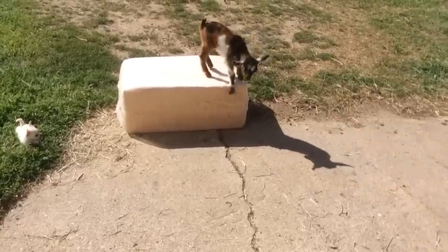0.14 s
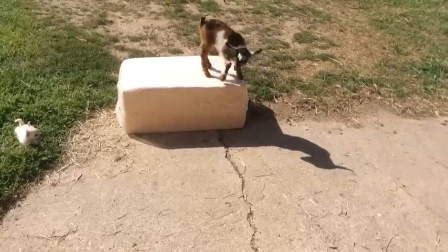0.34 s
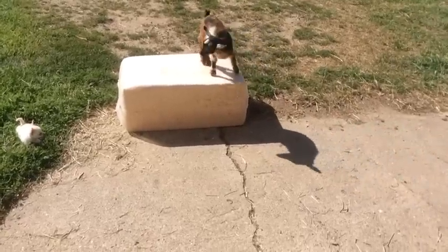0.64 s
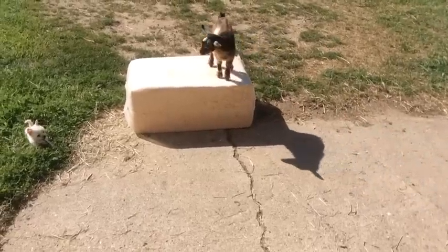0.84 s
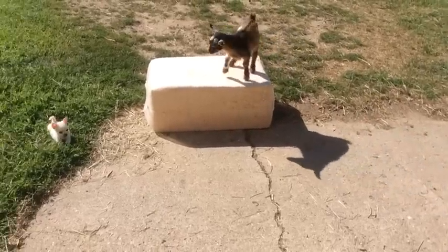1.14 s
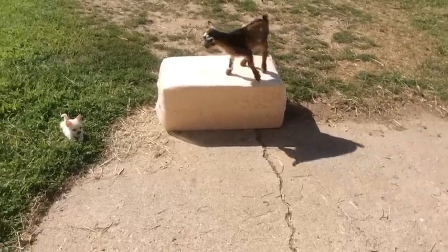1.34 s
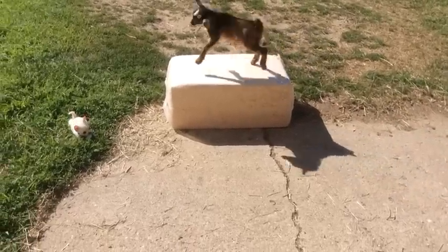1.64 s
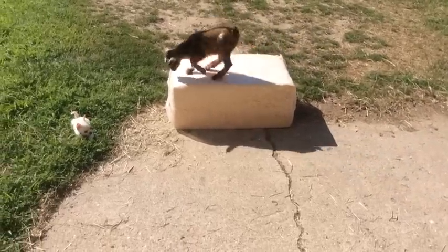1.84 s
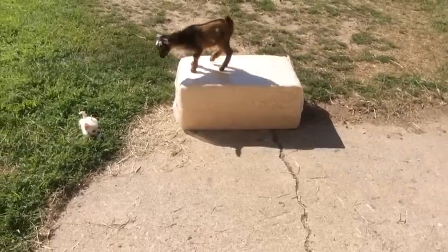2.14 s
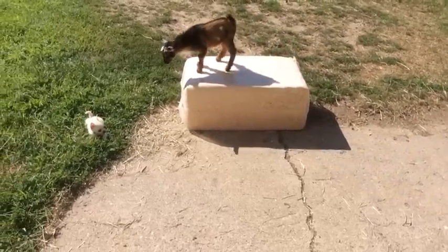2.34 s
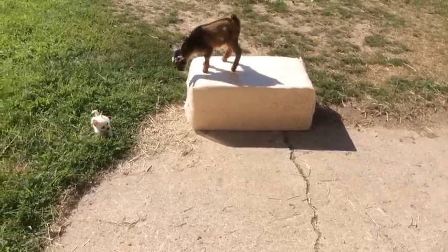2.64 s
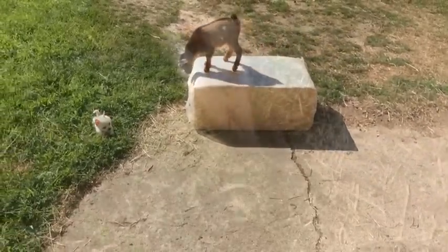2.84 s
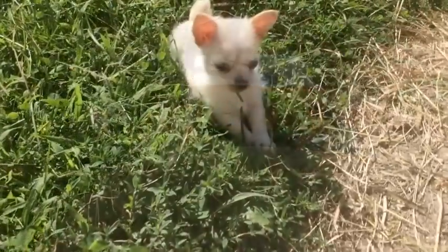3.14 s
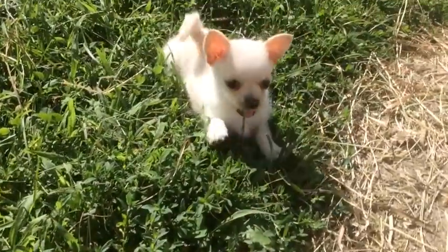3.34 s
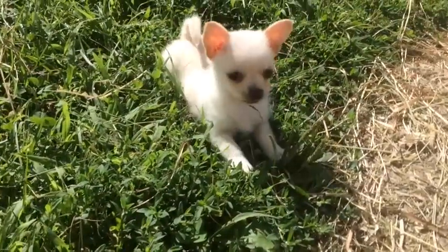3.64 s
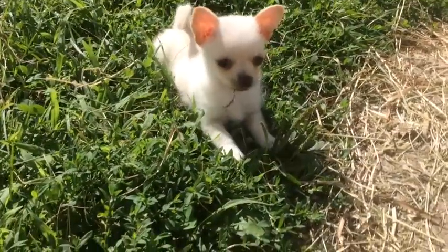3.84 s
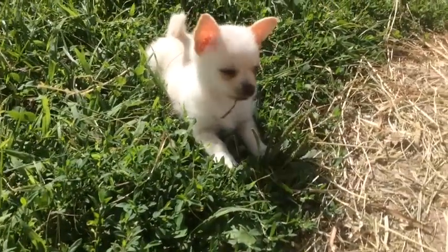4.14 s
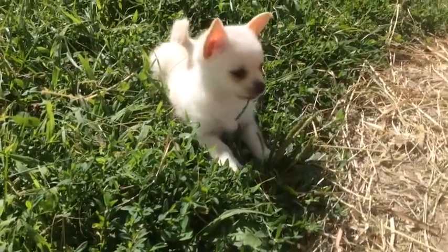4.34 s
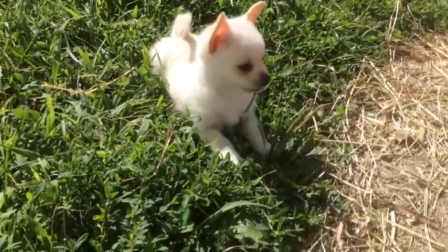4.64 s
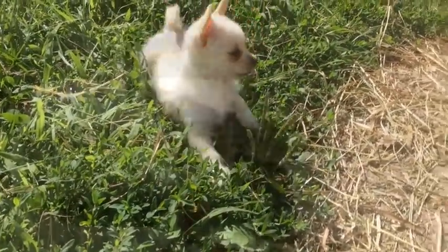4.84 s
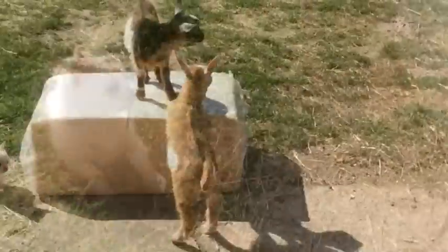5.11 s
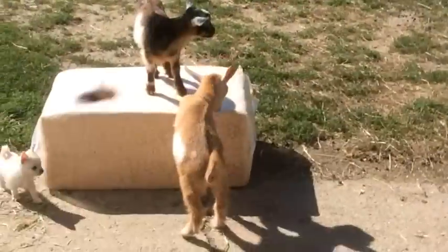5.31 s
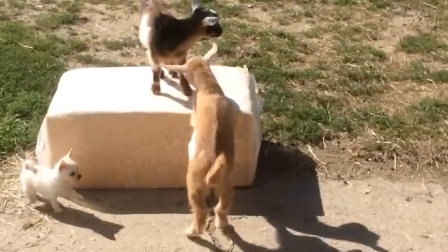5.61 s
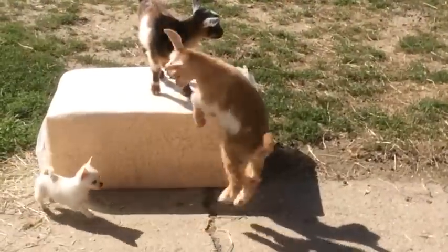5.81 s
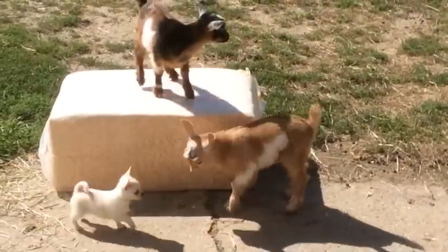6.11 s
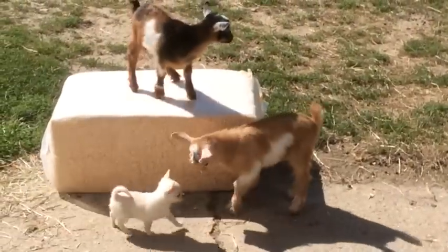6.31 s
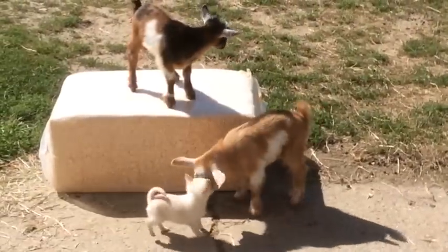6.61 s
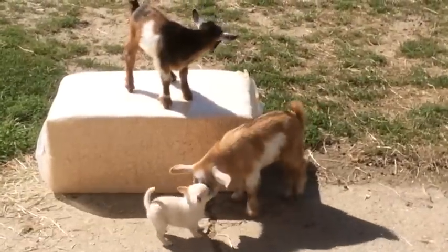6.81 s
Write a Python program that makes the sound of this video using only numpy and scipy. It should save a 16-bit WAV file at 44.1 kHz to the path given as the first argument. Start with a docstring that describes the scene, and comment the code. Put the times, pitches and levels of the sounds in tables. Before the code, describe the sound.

A goat kid gives a high, quavering bleat right at the start, a few metres away, lasting about half a second. Light hoof steps on a plastic-wrapped bale follow from 0.6 to 1.4 seconds. Firmer thuds land at around 1.9 seconds, together with a second, softer bleat. A third, quieter bleat comes at about 3.5 seconds. Light steps and small scrapes resume after 4.1 seconds, building to a quick, louder clatter of thuds and plastic crackle from 4.7 to 5.1 seconds. The last and loudest bleat trembles from 5.4 to 6 seconds, dropping slightly in pitch, followed by one soft hoof scuff. The yard has a faint, short echo. A light breeze, rustling grass and insect hiss continue quietly throughout. A distant bird peeps faintly during the first three seconds, and an insect chirps thinly and steadily from about 5.3 seconds until the end, near 7 seconds.

```python
"""Goat kids in a farmyard

Goat kids give four high, quavering bleats a few metres away. Each bleat is a chain of short throbs,
made by vocal folds that snap shut and set the throat and mouth ringing. Small hooves thud and scrape
on a plastic-wrapped bale, and the yard echoes faintly. Behind them a distant bird peeps, insects
chirp and hiss, and a light breeze blows over rustling grass."""
import sys
import numpy as np
from scipy import signal
from scipy.fft import rfft, irfft, next_fast_len
from scipy.io import wavfile
from scipy.ndimage import map_coordinates

SR = 44100
rng = np.random.default_rng(int(sys.argv[2]) if len(sys.argv) > 2 else 0)


def digitize_waveform(pressure):
    """Quantize a signal to 16-bit integers and store it at the path in sys.argv[1].

    Rows of a 2-D input are taken as channels; values are limited to [-1, 1].
    """
    field = np.atleast_2d(pressure).T
    bounded = np.clip(field, -1, 1)
    quanta = np.round(bounded * 32767).astype(np.int16)
    wavfile.write(sys.argv[1], SR, quanta)


N = 307359

# the throbs of each bleat: (peak time [s], level [dB], pitch [Hz], rise time [s])
BLEAT_1 = [(.012, -35, 213.6, .028), (.123, -32.5, 208.5, 0.03), (.224, -33, 202.7, 0.029),
           (.336, -35, 191.4, 0.028), (.438, -54.5, 203, 0.027)]
BLEAT_2 = [(1.914, -42, 221.6, .018), (2.015, -37.5, 231.5, .028), (2.115, -39.5, 217.3, .033),
           (2.224, -40.5, 206.3, .032), (2.35, -44.5, 173, 0.03)]
BLEAT_3 = [(3.448, -59, 202, 0.027), (3.547, -45, 221.2, 0.027), (3.648, -42.5, 214, 0.037),
           (3.756, -43.5, 203.6, 0.033), (3.865, -43, 193, 0.033), (3.957, -55, 202, 0.03),
           (3.997, -54.5, 187, .022)]
BLEAT_4 = [(5.383, -44, 231, 0.011), (5.407, -49, 234, 0.003), (5.487, -32, 226.7, 0.021),
           (5.589, -32, 221.7, 0.028), (5.694, -34, 222.3, 0.023), (5.807, -35.5, 201.1, .024),
           (5.935, -37.5, 186.6, 0.027), (6.07, -61.5, 171, .035)]
# resonances, where throat and mouth ring in each bleat: (base frequency [Hz], width [Hz], level [dB])
RESONANCES_1 = [(207, 74, -26.5), (393, 43, -29), (844, 107, -1), (1040, 66, -22.5), (1780, 177, -5.5),
                (2120, 100, -17.5), (2760, 340, -10), (3280, 430, -11.5), (4003, 400, 4.5),
                (4920, 850, -13), (9600, 2200, -26), (13200, 2500, -44)]
RESONANCES_2 = [(210, 110, -32), (410, 61, -18), (856, 83, -0.5), (1230, 400, -23), (1788, 110, -6),
                (2115, 85, -8), (2850, 340, -6), (3480, 150, -2), (3964, 310, 5), (5070, 610, -11),
                (9350, 2500, -29), (13200, 2300, -34)]
RESONANCES_3 = [(191, 120, -8), (465, 130, -1), (847, 106, 7.5), (1660, 200, -8), (2100, 66, -5.5),
                (2750, 1070, -1.5), (3930, 310, 7.5), (5080, 990, -2.5), (6700, 440, -17), (9600, 2500, -7),
                (14100, 870, -13)]
RESONANCES_4 = [(212, 85, -14), (460, 48, -24), (688, 16, -16.5), (864, 69, 2.5), (996, 19, 1.5),
                (1767, 200, 1), (2300, 220, -9.5), (2910, 1220, -8), (3247, 355, 5), (3687, 160, 4),
                (8800, 3000, -27), (13100, 3000, -32)]
# hoof blows, levels relative: (time [s], thud [dB], thud pitch [Hz], knock [dB], crackle [dB])
HOOF_BLOWS = [(.653, -61, 199, -49.5, -50), (.967, -47.5, 130, -56, -55.5), (1.819, -34.5, 220, -43.5, -52),
              (1.9008, -31.5, 141, -31.5, -37), (1.953, -38, 165, -49, -50), (2.16, -42.5, 168, -54, -49.5),
              (4.136, -48, 174, -48.5, -67), (4.279, -47.5, 242, -56, -57), (4.745, -35, 393, -43, -36),
              (4.7503, -24, 475, -40, -28.5), (4.759, -32, 383, -35, -27), (4.812, -33, 250, -41, -41),
              (4.818, -23.5, 534, -38, -41), (4.822, -31.5, 197, -36, -34), (4.831, -32.5, 172, -35.5, -44),
              (4.938, -57, 245, -46.5, -52), (4.969, -60, 248, -51, -58), (5, -39, 159, -37, -44.5),
              (5.017, -47, 196, -40, -51), (5.026, -41, 183, -33, -33), (5.068, -42, 152, -50, -60),
              (5.09, -39, 140, -35.5, -44), (5.117, -48, 145, -57, -68), (5.348, -57, 132, -44.5, -53),
              (6.079, -53, 163, -50, -71)]
# one light step, levels relative: (thud [dB], thud pitch [Hz], knock [dB], crackle [dB])
LIGHT_STEP = (-54, 170, -56, -57)
# spells of restless stepping: (start [s], end [s])
RESTLESS_SPELLS = [(0.599, 1.4), (4.15, 4.72), (4.951, 5.2)]
# the bale's tones: (frequency [times the thud pitch], level [dB], ring time [cycles of the thud pitch])
BALE_TONES = [(1, 3.5, 9), (.62, -8, 5.3), (1.45, -8, 9.4), (2.2, -17, 7)]
# hooves sliding on the wrap: (time [s], level [dB], half length [s])
HOOF_SLIDES = [(0.689, -67, 0.06), (1.837, -54, 0.017), (1.9017, -39.5, 0.0026), (4.249, -52, 0.0027),
               (4.333, -63.5, 0.014), (6.079, -57.5, 0.012)]
# tone colour of knocked straw, crackling wrap and a swish on plastic: (frequency [Hz], level [dB])
KNOCK_COLOUR = [(100, -4.5), (300, 5), (510, -2.5), (700, -3), (1000, -2.5), (1300, -13), (1900, -7),
                (3000, -7.5), (6000, -80), (16000, -59)]
CRACKLE_COLOUR = [(300, -26), (1400, -63), (2600, -6.5), (3900, 6), (5000, -1), (6400, 0), (7800, -4.5),
                  (11000, -6.5), (15500, -12)]
SWISH_COLOUR = [(2000, -12.5), (5000, -3), (9000, 2), (12500, -2), (15500, -6.5)]
# how long the yard echoes: (frequency [Hz], time to fade by 60 dB [s])
ECHO_TIMES = [(200, 0.18), (900, 0.18), (4000, 0.17), (10000, 0.13)]
# the bird's double peeps: (time [s], level [dB])
BIRD_PEEPS = [(.58, -71), (1.33, -62.5), (1.6, -63), (2.8, -65)]
# loudness of the background: (time [s], breeze [dB], grass rustle [dB], insect hiss [dB])
BACKGROUND_LEVELS = [(0, -70, -61, -64.5), (1.4, -71, -62.5, -69), (2.1, -66, -61, -65.5),
                     (2.7, -73, -62, -69), (3.2, -66, -68, -68.5), (3.7, -67, -62, -66),
                     (4.2, -63.5, -65, -69.5), (4.9, -66.5, -66, -67.5), (5.4, -73.5, -62.5, -65.5),
                     (6.97, -70, -65.5, -68.5)]
# tone colour of the breeze, the grass and the insect hiss: (frequency [Hz], level [dB])
BREEZE_COLOUR = [(15, -26), (25, -12), (50, -0.5), (82, 3.5), (118, -1.5), (146, -3.5), (204, -1.5),
                 (243, -7.5), (400, -15.5), (520, -32), (880, -120)]
RUSTLE_COLOUR = [(180, 2.5), (300, -0.5), (428, -1.5), (603, 1), (725, -3.5), (1180, -4), (1380, -6),
                 (4840, -6), (6140, -12.5), (7000, -15), (9100, -42), (15400, -120)]
HISS_COLOUR = [(3530, -51), (6000, -14), (7030, -2.5), (8000, 9), (9070, 3), (9640, -0.5), (11600, -2.5),
               (14500, -1.5), (15300, -6), (15800, -0.5)]


def bleat(throbs, throat, rough, scale, climb, settle_s, glide, darken_db, jitter, echo_db):
    """A goat's call: a chain of throbs through one throat, darker towards the end, with its echo."""
    voice = np.zeros(N)
    times, levels = np.transpose(throbs)[:2]
    for row, age, weakness_db in zip(throbs, times - times[0], levels.max() - levels):
        progress = age / np.ptp(times)
        hoarse = rough - 0.02 * weakness_db + 0.063 * progress ** 2  # rougher when loud, and late on
        low_boost_db = darken_db * progress ** 3.1
        upper_scale = scale - climb * np.exp(-age / settle_s)  # the upper resonances climb, then settle
        for start, pulse in throb(row, throat, hoarse, low_boost_db, upper_scale, glide, jitter):
            add(voice, start, pulse)
    return voice + amp(echo_db) * yard_echo(voice, delay_s=0.018)


def throb(row, throat, rough, low_boost_db, scale, glide, jitter, snaps=37, size=1024):
    """The vocal folds snap shut over and over as the mouth opens and closes: (start sample, pulse) pairs."""
    peak_s, db, pitch_hz, rise_s = row
    hz, t = np.fft.rfftfreq(size, 1 / SR), np.arange(size) / SR
    unevenness = jitter * rough * rng.standard_normal(snaps)
    when = (np.arange(snaps) - snaps // 2 + unevenness) / pitch_hz  # seconds from the peak
    when = when + 0.25 * when ** 2  # the snaps spread out, so the pitch sags
    opening = np.maximum(-when, 0) / rise_s
    closing = np.maximum(when, 0) / (0.53 * rise_s)  # a throb dies faster than it swells
    effort_db = -10 * opening ** 1.48 - 11 * closing ** 2.1
    voiced = np.clip(1 + (when + 1.42 * rise_s) * pitch_hz, 0, 1)  # the folds start within one cycle
    gain = mouth(throat, hz, opening, closing, low_boost_db, scale, glide)
    # each snap lets a puff of rushing air through, strongest in the treble
    puff = rng.standard_normal((snaps, size)) * fade(t, t60=0.013)
    puff = rfft(puff / np.linalg.norm(puff, axis=1, keepdims=True))
    air_share = np.clip(rough * along([(700, 0.72), (4000, 1.29), (9000, 8.5)], hz), 0, 0.95)
    start, fraction = np.divmod((peak_s + when) * SR, 1)
    snap = np.exp(-2j * np.pi * hz * fraction[:, None] / SR)  # a click placed between two samples
    source = np.sqrt(1 - air_share) * snap + np.sqrt(air_share) * puff
    pulses = irfft(ringing(gain) * source)
    flicker_db = 0.23 * rng.standard_normal(snaps)
    strength = voiced * amp(db + effort_db + flicker_db) * np.sqrt(SR / pitch_hz)
    return zip(start.astype(int), pulses * strength[:, None])


def mouth(throat, hz, opening, closing, low_boost_db, scale, glide, split_hz=2500):
    """Tone colour of each snap: as the mouth opens, low resonances swell and upper ones slide down."""
    closed = np.minimum(opening, 1.5)[:, None] ** 2
    slide = scale * (1 + glide * closed ** 1.4)
    muted_db = 4.5 * closed + 4 * np.minimum(closing, 2)[:, None]
    gain = 0
    for centre, width, db in throat:
        if centre < split_hz:
            db = db + low_boost_db - muted_db
        else:
            centre = centre * slide
        gain = gain + amp(db) / (1 + (2 * (hz - centre) / width) ** 2)
    middle_snap = gain[len(gain) // 2]
    return gain / np.sqrt(np.mean(middle_snap ** 2))


def hooves(grazes=3, graze_s=0.012, graze_db=-12.5, shifts=2, shift_db=-22):
    """Each hoof grazes the wrap ever harder, lands, then shifts as it takes the weight."""
    track = np.zeros(N)
    for s, thud_db, thud_hz, knock_db, crackle_db in HOOF_BLOWS:
        for k in range(1, grazes + 1):
            early_s = graze_s * (k - rng.random()) / grazes
            graze = hoof_touch(-np.inf, thud_hz, knock_db, crackle_db)  # no thud yet
            add(track, round((s - early_s) * SR), amp(graze_db) / k * graze)
        blow = (thud_db, thud_hz, knock_db, crackle_db)
        add(track, round(s * SR), hoof_touch(*blow))
        for delay_s in rng.uniform(0.018, 0.075, shifts):
            add(track, round((s + delay_s) * SR), amp(shift_db) * hoof_touch(*blow))
    return track


def hoof_touch(thud_db, thud_hz, knock_db, crackle_db):
    """A hoof meets the bale: the bale thuds softly, the packed straw knocks and the wrap crackles."""
    t = np.arange(SR // 5) / SR
    thud = 0
    for multiple, db, cycles in BALE_TONES:
        tone = np.sin(2 * np.pi * multiple * thud_hz * t)
        thud = thud + amp(db + rng.standard_normal()) * tone * fade(t, t60=cycles / thud_hz)
    thud = amp(thud_db - 2) * thud * (1 - np.exp(-t / 0.0015))
    knock = amp(knock_db) * noise(KNOCK_COLOUR, len(t)) * fade(t, t60=0.021)
    crackle = grit(len(t), spread_db=3) * noise(CRACKLE_COLOUR, len(t)) * fade(t, t60=0.019)
    onset = 1 - np.exp(-t / 0.00031)
    return (thud + knock + amp(crackle_db + 1.5) * crackle) * onset


def shuffles(steps_per_spell=4, spread_db=0.5):
    """A few light steps fall at chance moments in each restless spell."""
    track = np.zeros(N)
    for begin, end in RESTLESS_SPELLS:
        for s in rng.uniform(begin, end, steps_per_spell):
            add(track, round(s * SR), amp(rng.normal(0, spread_db)) * hoof_touch(*LIGHT_STEP))
    return track


def slides():
    """A hoof dragged over the wrap makes a thin, gritty swish."""
    track, t = np.zeros(N), np.arange(-SR // 10, SR // 10) / SR
    for s, db, half_s in HOOF_SLIDES:
        swell = amp(db) * np.exp(-(t / half_s) ** 2)
        swish = grit(len(t), spread_db=3.5) * noise(SWISH_COLOUR, len(t))
        add(track, round((s + t[0]) * SR), swell * swish)
    return track


def yard_echo(sound, delay_s):
    """The ground and the farm buildings throw back a short echo."""
    hz, t, bands = signal.stft(rng.standard_normal(SR // 2), SR, nperseg=256)
    tail = signal.istft(bands * fade(t, along(ECHO_TIMES, hz)[:, None]), SR, nperseg=256)[1]
    delayed = np.pad(sound, (int(delay_s * SR), 0))
    return signal.fftconvolve(delayed, tail / np.linalg.norm(tail))[:N]


def bird(gap_s=0.036):
    """A distant bird peeps in pairs."""
    notes = [(s + delay_s, db) for s, db in BIRD_PEEPS for delay_s in (0, gap_s)]
    return chirps(notes, top_hz=4840, half_s=0.011, arch_hz=125.5, waver_hz=280)


def insect(start_s=5.347, every_s=0.301, first_db=-67, growth_db=1.3):
    """An insect chirps at a steady beat, growing louder."""
    notes = [(start_s + k * every_s, first_db + k * growth_db) for k in range(6)]
    return chirps(notes, top_hz=8930, half_s=0.032, arch_hz=220, waver_hz=170)


def chirps(notes, top_hz, half_s, arch_hz, waver_hz):
    """Thin, wavering notes whose pitch rises and falls in an arch."""
    track, t = np.zeros(N), np.arange(-SR // 10, SR // 10) / SR
    for s, db in notes:
        waver = waver_hz * noise([(400, 7), (1200, -6)], len(t))
        pitch = top_hz - arch_hz * (t / half_s) ** 2 + waver
        swell = amp(db) * np.exp(-(t / half_s) ** 2)
        add(track, round((s + t[0]) * SR), swell * np.sin(2 * np.pi * np.cumsum(pitch) / SR))
    return track


def outdoors():
    """A low, uneven breeze, rustling grass and a constant hiss of insects."""
    times, *columns = np.transpose(BACKGROUND_LEVELS)
    breeze_db, rustle_db, hiss_db = [np.interp(np.arange(N) / SR, times, db) for db in columns]
    breeze = amp(breeze_db + 3.45 * wobble(12)) * noise(BREEZE_COLOUR, N)
    rustle = amp(rustle_db + 1.37 * wobble(23)) * noise(RUSTLE_COLOUR, N)
    hiss = amp(hiss_db + wobble(12)) * noise(HISS_COLOUR, N)
    return breeze + rustle + hiss


def amp(db):
    """Turn decibels into a number to multiply by."""
    return 10 ** (np.asarray(db) / 20)


def unit(x):
    """Scale a signal to an average strength (rms) of 1."""
    return x / np.sqrt(np.mean(x ** 2) + 1e-20)


def fade(t, t60):
    """Die away by 60 dB every t60 seconds."""
    return np.exp(-np.log(1000) * t / np.maximum(t60, 1e-3))


def along(points, hz):
    """Read between (frequency, value) points, with octaves evenly spaced."""
    frequencies, values = np.transpose(points)
    return np.interp(np.log(hz + 1), np.log(frequencies + 1), values)


def wobble(rate):
    """A smooth curve through `rate` random values a second."""
    return map_coordinates(rng.standard_normal(int(N * rate / SR) + 4), [np.arange(N) * rate / SR])


def grit(size, spread_db):
    """A grainy loudness that jumps at random about 2000 times a second."""
    return unit(amp(spread_db * np.repeat(rng.standard_normal(size), SR // 2000)[:size]))


def noise(colour, size):
    """Noise of strength 1 with the given tone colour."""
    padded = next_fast_len(size)
    gain = amp(along(colour, np.fft.rfftfreq(padded, 1 / SR)))
    return unit(irfft(rfft(rng.standard_normal(padded)) * gain, padded)[:size])


def ringing(gain):
    """A filter with this gain that rings only after it is struck (minimum phase)."""
    cepstrum = irfft(np.log(gain + 1e-6))
    half = cepstrum.shape[-1] // 2
    cepstrum[..., 1:half] *= 2
    cepstrum[..., half + 1:] = 0
    return np.exp(rfft(cepstrum))


def add(track, start, sound):
    """Mix a sound into a track from a given sample on."""
    lo, hi = max(start, 0), min(start + len(sound), len(track))
    if hi > lo:
        track[lo:hi] += sound[lo - start:hi - start]


def scene():
    """Goats and hooves in the open yard, in one channel."""
    goats = (bleat(BLEAT_1, RESONANCES_1, rough=0.22, scale=1.03, climb=0.082, settle_s=0.2,
                   glide=0.049, darken_db=10, jitter=0.015, echo_db=-18.5)
             + bleat(BLEAT_2, RESONANCES_2, rough=0.34, scale=1.017, climb=0.21, settle_s=0.072,
                     glide=0.058, darken_db=4, jitter=0.0214, echo_db=-18)
             + bleat(BLEAT_3, RESONANCES_3, rough=0.26, scale=1.013, climb=0.062, settle_s=0.25,
                     glide=0.1, darken_db=14, jitter=0.0069, echo_db=-10)
             + bleat(BLEAT_4, RESONANCES_4, rough=0.14, scale=1.146, climb=0.23, settle_s=0.2,
                     glide=0.055, darken_db=15.5, jitter=0.024, echo_db=-15.5))
    steps = hooves() + shuffles() + slides()
    step_echo = amp(-13) * yard_echo(steps, delay_s=0.0055)
    return (goats + steps + step_echo + insect() + bird() + outdoors())[None]


def record(dry, bass_hz=63.5, top_hz=15650):
    """A small microphone thins the deep bass, and the very highest treble is cut off."""
    padded = next_fast_len(N + SR // 2)
    thinned = signal.sosfilt(signal.butter(2, bass_hz, "highpass", fs=SR, output="sos"), dry)
    kept = np.fft.rfftfreq(padded, 1 / SR) < top_hz
    return irfft(rfft(thinned, padded) * kept, padded)[..., :N]


dry = scene()
out = record(dry)
digitize_waveform(out)
```